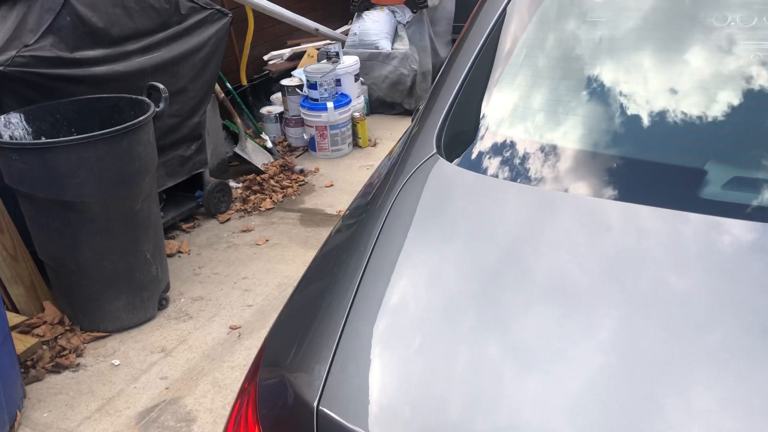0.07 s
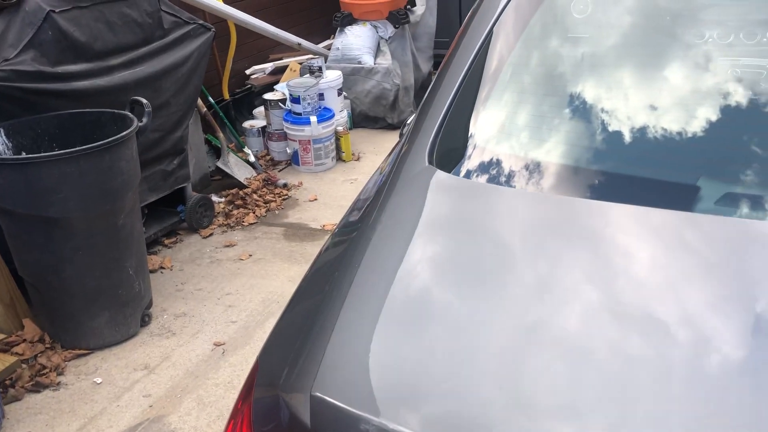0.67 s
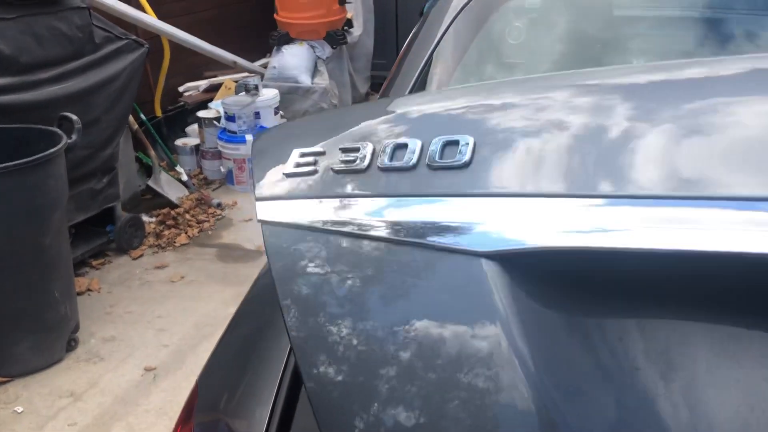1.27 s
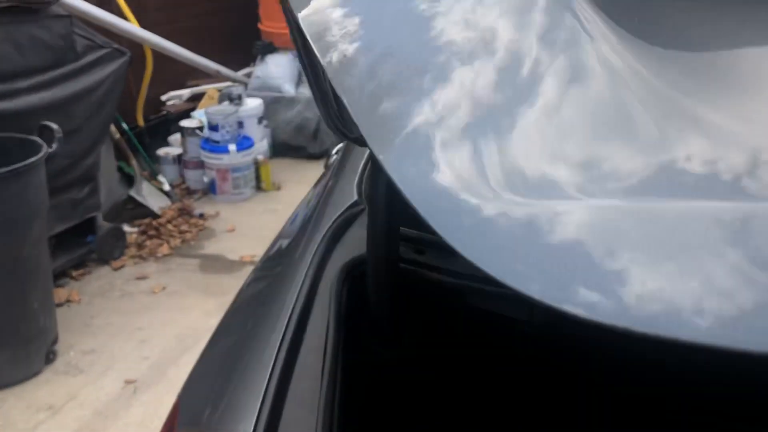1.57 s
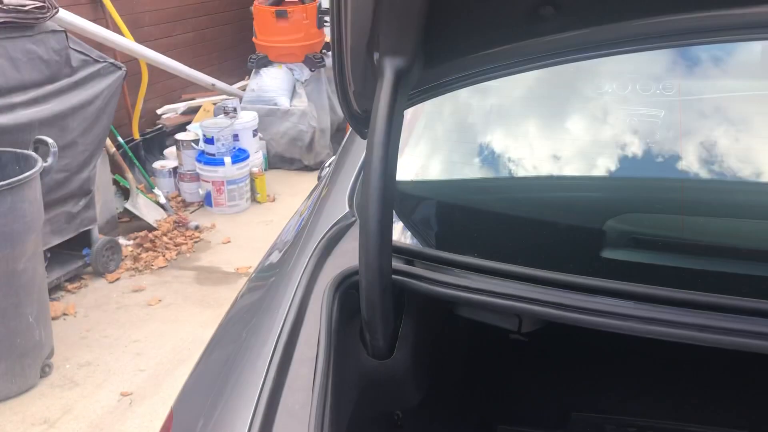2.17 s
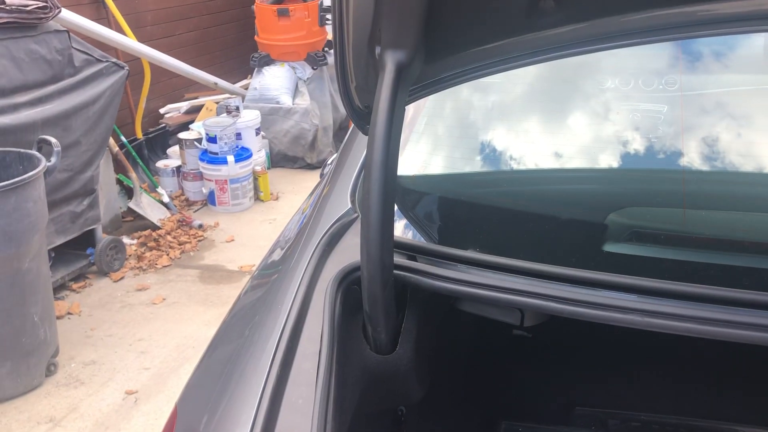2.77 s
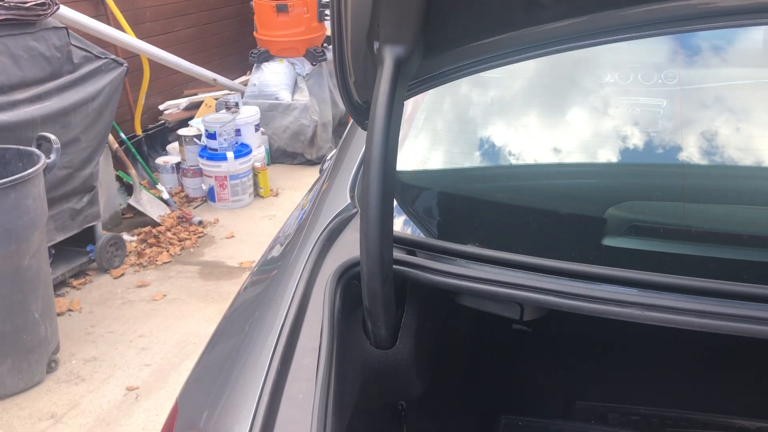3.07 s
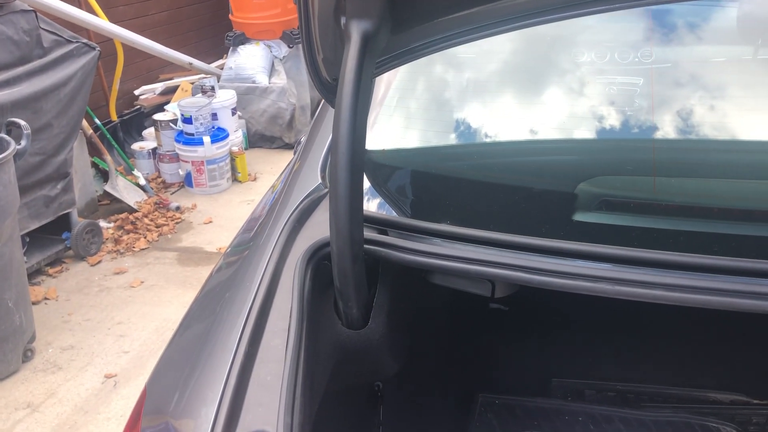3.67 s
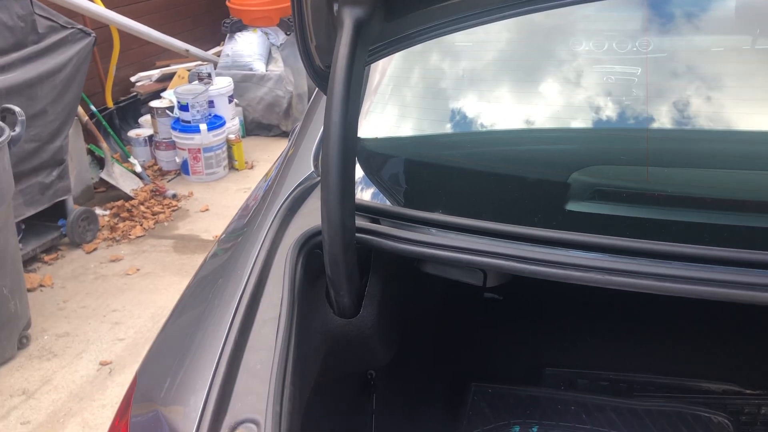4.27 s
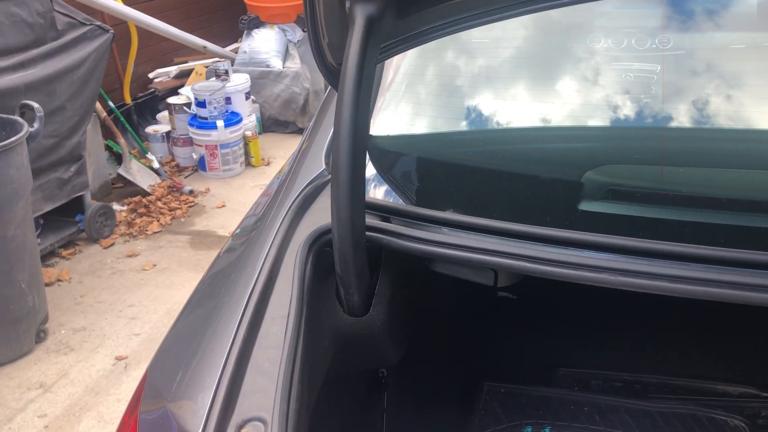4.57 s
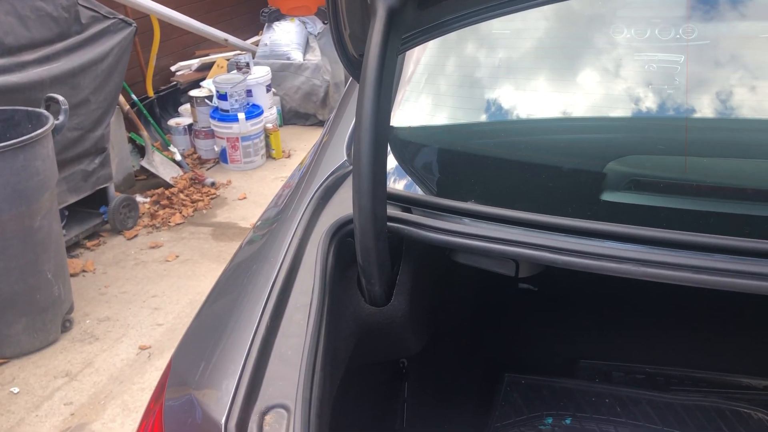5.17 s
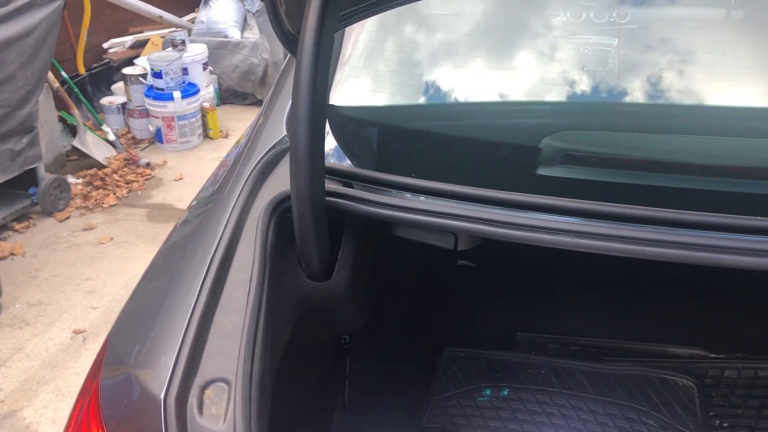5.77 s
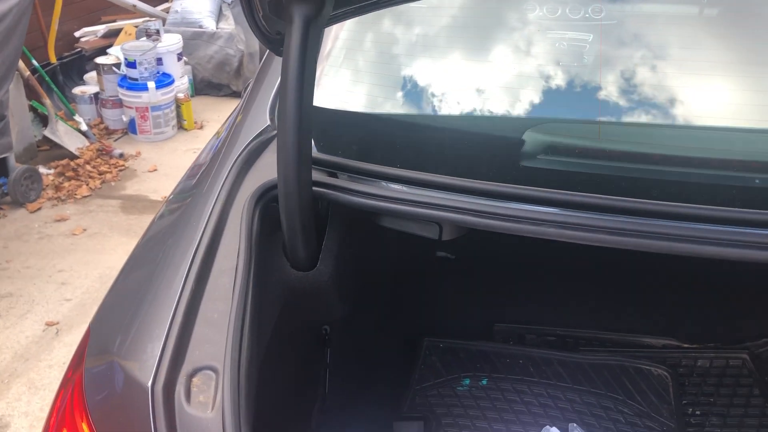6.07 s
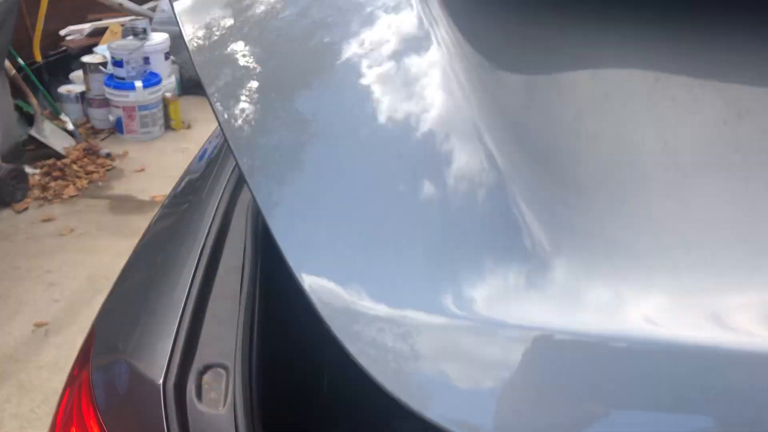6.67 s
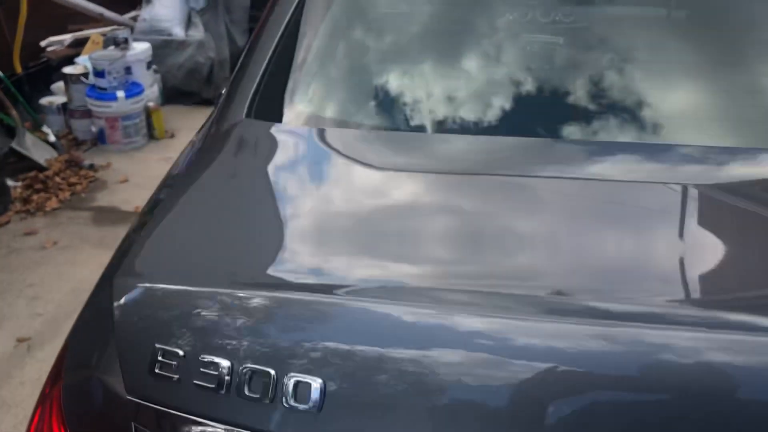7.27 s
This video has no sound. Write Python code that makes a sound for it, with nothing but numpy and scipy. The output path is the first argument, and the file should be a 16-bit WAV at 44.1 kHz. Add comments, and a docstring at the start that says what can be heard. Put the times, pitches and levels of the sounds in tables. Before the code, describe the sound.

A car engine idles quietly in a yard, with faint road noise far away. Close to the microphone, a trunk latch ticks and releases with a sharp clunk and a low thump. About two seconds later the lid hits its hinge stops with a loud, booming clank, and the springs ring briefly. A few faint ticks and soft bumps follow while the engine keeps running.

```python
"""Car trunk opening over an idling engine

A four-cylinder engine idles in a yard, with road noise far off. The latch actuator ticks, the catch
lets go with a clunk and the lid jumps off its seal. Two seconds later it swings into its hinge stops,
booms and leaves the springs ringing; faint ticks and bumps follow. Each impact excites damped
normal modes: high ones in the small steel parts, low ones in the broad panels of the lid."""
import sys
import numpy as np
from scipy import signal
from scipy.fft import rfft, irfft, next_fast_len
from scipy.io import wavfile

SR = 44100
rng = np.random.default_rng(int(sys.argv[2]) if len(sys.argv) > 2 else 0)


def wav_out(sig):
    """Save sig, one row per channel (or a flat mono array), as 16-bit PCM at SR to the path in sys.argv[1]."""
    wavfile.write(sys.argv[1], SR, np.round(np.clip(np.atleast_2d(sig).T, -1, 1) * 32767).astype(np.int16))


N = 322812
TIME = np.arange(N) / SR
RING = TIME[:int(1.2 * SR)]  # time axis of a free vibration [s]
TOP_HZ = 15750


def undb(db):
    """Amplitude ratio of a level in decibels."""
    return 10 ** (np.asarray(db) / 20)


def unit(x):
    """Normalisation to rms 1."""
    return x / np.std(x)


def add(out, s, sound):
    """Superposition: a sound joins the mix at time s."""
    i = int(s * SR)
    out[i:i + len(sound)] += sound[:N - i]


def noise(size, hz, octaves):
    """Band noise of rms 1: pink noise under a Gaussian bell in log frequency."""
    padded = next_fast_len(size)
    f = np.maximum(np.fft.rfftfreq(padded, 1 / SR), 1)
    bell = np.exp(-.5 * (np.log2(f / hz) / octaves) ** 2) / np.sqrt(f)
    return unit(irfft(rfft(rng.standard_normal(padded)) * bell, padded)[:size])


def walk(rate):
    """Random modulation with a spread near 1, interpolated between `rate` values a second."""
    knots = rng.standard_normal(1024)
    return np.interp(TIME * rate, np.arange(len(knots)), knots)


def low_cut(x, hz):
    """Second-order high-pass: 12 dB per octave below the corner."""
    return signal.lfilter(*signal.butter(2, hz, "high", fs=SR), x)


def modes(table, opposed=False):
    """Free vibration as damped sines; neighbours in opposed phase cancel at first, then swell."""
    return sum((-1) ** (k * opposed) * undb(db) * np.sin(2 * np.pi * hz * RING) * 1000 ** (-RING / t60)
               for k, (hz, db, t60) in enumerate(table))


def click(hz, octaves, t60, rise_s=0.00047, size=8192):
    """A light, well-damped contact: band noise with a fast rise and exponential decay."""
    t = RING[:size]
    return noise(size, hz, octaves) * 1000 ** (-t / t60) * (1 - np.exp(-t / rise_s))


def crash(table, rise_cycles, bands=22, size=16384):
    """Modal overlap: dense modes act as decaying third-octave noise bands; low ones build up later."""
    hz, db, t60 = np.transpose(table)
    t, out = RING[:size], 0
    thirds = 3 * np.log2(np.maximum(np.fft.rfftfreq(size, 1 / SR), 1) / TOP_HZ)
    white = rfft(rng.standard_normal(size))
    for k in range(bands):
        centre = TOP_HZ / 2 ** (k / 3)
        triangle = np.maximum(1 - abs(thirds + k), 0)
        band = unit(irfft(white * triangle)) / np.sqrt(3)  # a third of an octave's power
        level, decay = (np.interp(np.log(centre), np.log(hz), column) for column in (db, t60))
        rise = 1 - np.exp(-t * centre / rise_cycles)
        out = out + band * undb(level) * 1000 ** (-t / decay) * rise
    return out


def strike(hits, ring, crash_table, rise_cycles):
    """Impact on steel excites distinct and dense modes; a softer contact acts as a low-pass."""
    out = np.zeros(N)
    for s, crash_db, bright_hz, ring_db in hits:
        blow = undb(ring_db) * ring
        add(blow, 0, undb(crash_db) * crash(crash_table, rise_cycles))
        soften = signal.butter(1, min(bright_hz, SR / 2 - 1000), fs=SR)
        add(out, s, signal.lfilter(*soften, blow))
    return out


def boom(pushes, mode_table):
    """Forced response: half-sine pushes through rubber, convolved with the ring of the lid's panels."""
    out, ring = np.zeros(N), modes(mode_table)
    for s, db, length in pushes:
        force = np.sin(np.pi * np.minimum(RING[:2048] / length, 1))
        add(out, s, undb(db) * signal.fftconvolve(ring, force / force.sum()))
    return out


def engine(firing_hz=24.33, tick_db=-55, tick_s=0.0037, first_tick_s=0.01077, valve_db=-62, clatter_db=3):
    """Periodic firing paces hum, injector ticks and valve patter; covers resonate, fan and belts rush."""
    # hum of engine and belt drive: (multiple of the firing rate, rms level [dB])
    partials = [(2, -75), (3, -49), (3.64, -56), (4, -59), (5, -53), (7, -59), (11, -70)]
    # resonances of covers and brackets: (frequency [Hz], nominal width [Hz], rms level [dB])
    cover_modes = [(824, 18, -69), (1002, 16, -65.5), (1142, 71, -62), (1534, 116, -63), (1877, 27, -66),
                   (2345, 44, -71), (2660, 60, -69.5), (3735, 90, -70), (4290, 57, -70), (4570, 82, -71),
                   (5560, 27, -78)]
    # spectrum of fan and belts: (frequency [Hz], relative spectral density [dB])
    rush_spectrum = [(25, -1.5), (45, -6.5), (66, -4.5), (100, -10), (135, -2.5), (250, -10), (460, -16),
                     (1000, -15.5), (1400, -18), (1950, -20), (3100, -24.5), (4700, -26), (5800, -32.5),
                     (10000, -37.5), (15500, -45)]
    firings = np.cumsum(firing_hz * (1 + 0.00293 * walk(3.11))) / SR - first_tick_s * firing_hz
    hum = sum(undb(db + 1.8 * walk(9)) * np.sqrt(2) * np.sin(2 * np.pi * (k * firings + rng.random()))
              for k, db in partials)
    tick_age = firings % 1 / firing_hz / tick_s
    injector = np.sin(2 * np.pi * (4660 * TIME + 0.37 * walk(300)))
    ticks = undb(tick_db + 2.4 * walk(24)) * tick_age * np.exp(1 - tick_age) * injector
    valve_beat = clatter_db * np.cos(np.pi * firings)  # once a crank turn, or every other firing
    valves = undb(valve_db + 2 * walk(13) + valve_beat) * noise(N, hz=1790, octaves=0.21)
    covers = sum(undb(db + 2 * walk(10)) * noise(N, hz, width / hz / 2) for hz, width, db in cover_modes)
    hz, db = np.transpose(rush_spectrum)
    f = np.maximum(np.fft.rfftfreq(N, 1 / SR), 1)
    colour = undb(np.interp(np.log(f), np.log(hz), db))
    rush = unit(irfft(rfft(rng.standard_normal(N)) * colour, N))
    rush_db = -45.5 + 0.44 * walk(8.5)
    return hum + ticks + valves + covers + undb(rush_db) * rush


def passing(s, db, half_length):
    """Spherical spreading: the gain of a source passing on a straight line is one over its distance."""
    return undb(db) / np.hypot(1, (TIME - s) / half_length)


def traffic(spread_octaves=2.6, flutter_db=2.0, waver=0.0169, drone_flutter_db=1.5):
    """Incoherent swells of far road noise add in power; wavering drones glide as they pass."""
    # road noise: (peak time [s], level [dB], time to half power [s], centre [Hz])
    road_swells = [(2.103, -49, 0.21, 300), (5.2, -48, 0.41, 75), (6.05, -47.5, 0.35, 249),
                   (7.3, -47, 0.36, 220)]
    # far drones: (peak time [s], level [dB], time to half power [s], pitch [Hz], glide [octaves/s])
    drones = [(1.65, -49.5, 0.29, 219.1, -.24), (7.1, -45, 0.075, 173.3, .2)]
    centres = 60 * 2 ** (np.arange(10) / 2)  # half-octave bands [Hz]
    power = 0
    for s, db, half_length, hz in road_swells:
        colour = np.exp(-(np.log2(centres / hz) / spread_octaves) ** 2)
        power = power + np.outer(colour / np.linalg.norm(colour), passing(s, db, half_length)) ** 2
    out = sum(np.sqrt(band_power) * undb(flutter_db * walk(9.8)) * noise(N, hz, octaves=0.23)
              for hz, band_power in zip(centres, power))
    for s, db, half_length, hz, glide in drones:
        pitch = hz * 2 ** (glide * (TIME - s)) * (1 + waver * walk(25))
        tone = np.sqrt(2) * np.sin(2 * np.pi * np.cumsum(pitch) / SR)
        out = out + passing(s, db, half_length) * undb(drone_flutter_db * walk(17)) * tone
    return out


def actuator(release_s=0.176):
    """Heavily damped impacts: the release knocks, then two strokes rattle the pawl in its housing."""
    # dull knock of the release: (frequency [Hz], level [dB], t60 [s])
    release_modes = [(595, -28.5, 0.031), (864, -30, 0.032)]
    # strokes that draw the pawl back: (time [s], level [dB])
    strokes = [(0.2762, -28.5), (0.2905, -24.5)]
    # resonances of pawl and housing: (centre [Hz], relative level [dB], width [octaves], t60 [s])
    body = [(3380, -0.5, 0.92, 0.041), (750, -5, 1, 0.11)]
    out = np.zeros(N)
    add(out, release_s, modes(release_modes, opposed=True))
    for s, db in strokes:
        rattle = sum(undb(part_db) * click(hz, octaves, t60) for hz, part_db, octaves, t60 in body)
        add(out, s, undb(db) * rattle)
    return out


def latch():
    """Impact excitation: the catch snaps open and rings; the lid booms as it jumps off its seal."""
    # contacts in the latch: (time [s], crash gain [dB], low-pass corner [Hz], ring gain [dB])
    hits = [(.3238, -15, 7000, -26), (.3254, 2.5, 15000, -1), (.3292, -5, 12000, -36),
            (.349, -6.5, 6000, -31), (.3695, -12, 7000, -32)]
    # distinct modes of the latch: (frequency [Hz], level [dB], t60 [s])
    catch_modes = [(560, -19, .13), (926, -23, .11), (1130, -22, .06), (1230, -18, .05), (1300, -14, .06),
                   (1375, -20, .07), (1575, -20, .08), (1635, -23, .09), (2760, -27, .05), (3350, -26, .06),
                   (3920, -27, .05), (5450, -26, .04), (5680, -24, .035)]
    # dense modes between them: (frequency [Hz], level in an octave [dB], t60 [s])
    dense_modes = [(150, -21.5, 0.19), (330, -28, 0.28), (448, -32.5, 0.28), (600, -32, 0.35),
                   (740, -35, 0.18), (1000, -23, 0.067), (1420, -19.5, 0.096), (1820, -34, 0.12),
                   (3500, -23, 0.048), (5640, -24.5, 0.042), (7250, -42, 0.096), (15000, -36, 0.087)]
    # pushes on the lid as it leaves the seal and bobs: (time [s], gain [dB], duration [s])
    pushes = [(.3275, -6.5, 0.0036), (.3359, 1.5, 0.0014), (.3477, -7, 0.0022), (.3984, -11.5, 0.0024),
              (.472, -14.5, 0.0062), (.585, -22, 0.0059)]
    # panel modes of the shut lid: (frequency [Hz], level [dB], t60 [s])
    lid_modes = [(60, -33, 0.44), (72, -38, 0.35), (100.4, -30, 0.65), (118, -20, 0.17), (153, -14, 0.097),
                 (171, -12, 0.13), (229.3, -21.5, 0.37), (332, -18, 0.081)]
    ring = modes(catch_modes, opposed=True)
    return strike(hits, ring, dense_modes, rise_cycles=0.63) + boom(pushes, lid_modes)


def trim(ping_gain_db=-1, scuff_s=5.195, scuff_db=-47):
    """Light contacts give short transients: hinges and trim tick, ping, bump and scuff."""
    # ticks of hinges and trim: (time [s], level [dB], centre [Hz], ping of the touched part [Hz])
    ticks = [(2.028, -46, 3270, 3300), (2.093, -38, 1400, 800), (2.138, -53, 6760, 6500),
             (2.563, -35, 1200, 997), (2.563, -51, 5500, 6400), (5.152, -54, 7500, 6700),
             (5.219, -48.5, 5500, 6300), (6.189, -44.5, 3900, 5200), (6.259, -37.5, 1600, 1600)]
    # soft, low bumps: (time [s], level [dB])
    bumps = [(5.825, -40), (6.255, -39), (6.505, -39)]
    out = np.zeros(N)
    for s, db, hz, ping_hz in ticks:
        add(out, s, undb(db) * click(hz, octaves=0.92, t60=0.06))
        add(out, s, modes([(ping_hz, db + ping_gain_db, 0.064)]))
    for s, db in bumps:
        add(out, s, undb(db) * click(hz=250, octaves=0.27, t60=0.15))
    add(out, scuff_s, undb(scuff_db) * click(hz=1900, octaves=1.1, t60=0.29))
    return out


def hinge_stop(shiver_db=-43, shiver_hz=730, shiver_t60=2.0):
    """Sudden deceleration: the hinges clank home, the lid booms, the lightly damped springs ring on."""
    # arms chattering on their stops: (time [s], crash gain [dB], low-pass corner [Hz], ring gain [dB])
    hits = [(2.2058, -15, 900, -19), (2.2179, -1, 20000, -13), (2.2193, -1, 12000, -0.5),
            (2.233, -7.5, 3000, -21), (2.2387, -11, 1500, -26), (2.2466, -16.5, 3500, -37),
            (2.2645, -19.5, 3500, -31)]
    # distinct modes of the hinge arms: (frequency [Hz], level before the low cut [dB], t60 [s])
    arm_modes = [(546, -18, .16), (592, -16, .1), (632, -18, .14), (732, -16.5, .12), (775, -20, .09),
                 (872, -22, .12), (990, -17, .13), (1063, -25, .09), (1191, -21, .12), (1385, -17, .08),
                 (1457, -19, .09), (2660, -27, .07), (3297, -24, .065), (4650, -28, .04), (6010, -20, .035),
                 (6210, -23, .04)]
    # dense modes between them: (frequency [Hz], level in an octave [dB], t60 [s])
    dense_modes = [(150, -26, 0.5), (400, -35, 0.3), (680, -13.5, 0.13), (1440, -18, 0.076),
                   (2150, -31.5, 0.18), (3300, -15.5, 0.031), (6200, -19, 0.042), (7400, -22, 0.037),
                   (10800, -17, 0.027), (12500, -30, .04), (16000, -31, .04)]
    # pushes that stop the lid's swing: (time [s], gain [dB], duration [s])
    pushes = [(2.2335, -11, 0.0015), (2.243, -1.5, 0.0023), (2.2578, -8, 0.0052)]
    # panel modes of the raised lid: (frequency [Hz], level [dB], t60 [s])
    lid_modes = [(62, -24.5, 0.58), (108, -12, 0.14), (122.8, -29, 0.42), (184, -22, 0.17),
                 (212.6, -25, 0.47), (222.4, -33, 0.43), (275, -27.5, 0.29), (362, -33, 0.27)]
    # modes of the springs: (frequency [Hz], level [dB], t60 [s])
    spring_modes = [(550, -46, 1.9), (644, -49, 0.94), (707, -45, 1.4), (750, -51, .9), (786, -43, 1.4),
                    (875, -50, 1.3), (925, -55, 1.1)]
    ring = low_cut(modes(arm_modes), hz=503)  # slim arms radiate little bass
    out = strike(hits, ring, dense_modes, rise_cycles=0.42) - boom(pushes, lid_modes)
    # the coils have many close modes, which blur into a shiver
    shiver = undb(shiver_db) * noise(len(RING), shiver_hz, octaves=0.3) * 1000 ** (-RING / shiver_t60)
    add(out, hits[0][0], modes(spring_modes) + shiver)
    return out


def yard(x, echo_db=-24.02, t60=0.25, rise_s=0.011, corner_hz=5000, size=16384):
    """Diffuse reflection: car body, ground and house wall add a short, duller echo."""
    t = RING[:size]
    scatter = signal.lfilter(*signal.butter(1, corner_hz, fs=SR), rng.standard_normal(size))
    echo = scatter * 1000 ** (-t / t60) * (1 - np.exp(-(t / rise_s) ** 2))
    return x + undb(echo_db) * signal.fftconvolve(x, echo / np.linalg.norm(echo))[:N]


def scene():
    """Superposition in one channel: the nearby trunk and its echo, the engine and the street."""
    trunk = actuator() + latch() + hinge_stop() + trim()
    return (yard(trunk) + engine() + traffic())[None]


def record(dry):
    """Band limiting and soft saturation: the deepest bass goes, peaks are rounded, the top is cut."""
    thin = low_cut(dry, hz=41.8)
    rounded = thin / (1 + thin ** 6) ** (1 / 6)
    return signal.sosfilt(signal.ellip(10, .1, 70, TOP_HZ, fs=SR, output="sos"), rounded)


dry = scene()
out = record(dry)
wav_out(out)
```